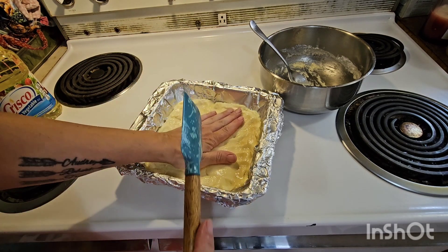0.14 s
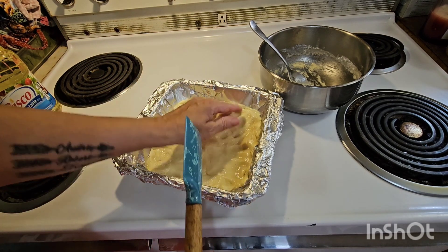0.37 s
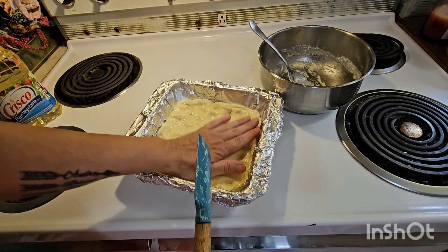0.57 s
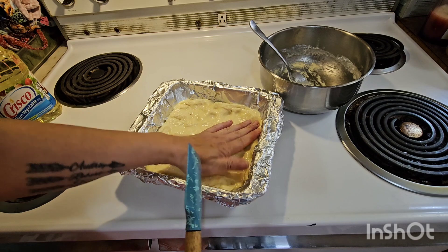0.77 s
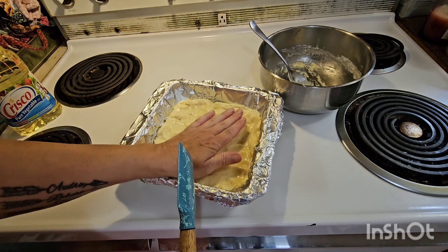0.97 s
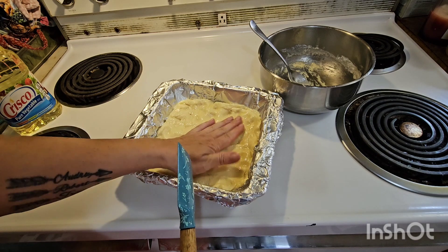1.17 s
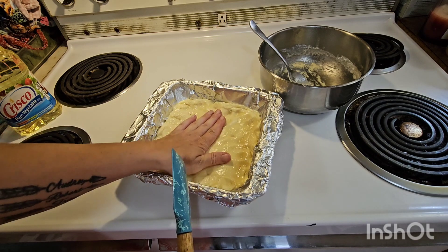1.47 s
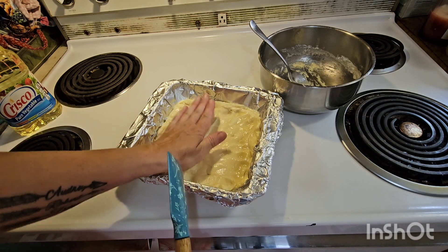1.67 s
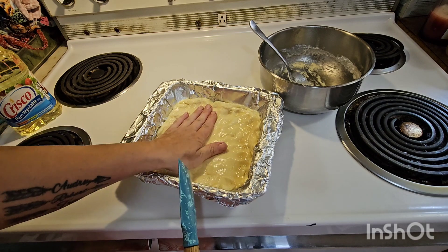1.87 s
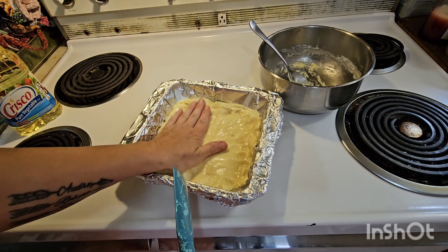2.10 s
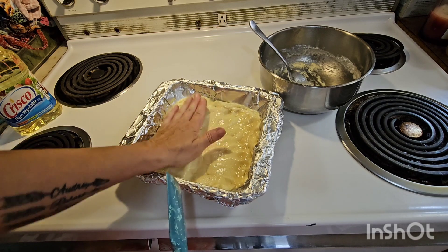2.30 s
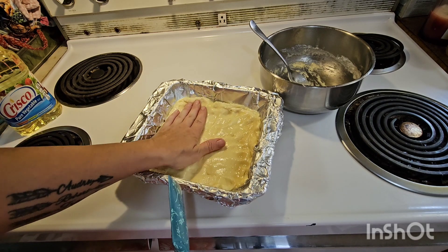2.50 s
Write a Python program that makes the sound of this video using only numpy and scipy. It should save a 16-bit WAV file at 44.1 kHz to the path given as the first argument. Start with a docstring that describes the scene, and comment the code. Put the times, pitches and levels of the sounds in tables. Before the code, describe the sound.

Foil crackling in a baking pan under a hand pressing dough, close up in a kitchen.

```python
"""A small hard kitchen, a stereo microphone close to the stove, an appliance humming low behind.
A hand presses sticky dough into a baking pan lined with aluminium foil. Each press makes the foil
crinkle, and its creases buckle in sharp snaps, often in pairs; the pan knocks dully under them.
The palm thuds softly through the dough, and the stove top and walls answer the foil and the pan."""
import sys
import numpy as np
from scipy import signal
from scipy.fft import rfft, irfft, next_fast_len
from scipy.io import wavfile

SR = 44100
rng = np.random.default_rng(int(sys.argv[2]) if len(sys.argv) > 2 else 0)


def persist_wave(psi):
    """Save psi, clipped to +-1, as 16-bit WAV."""
    counts = np.round(np.clip(psi, -1, 1) * 32767).astype(np.int16)
    wavfile.write(sys.argv[1], SR, np.atleast_2d(counts).T)


N = 116865
T = np.arange(N) / SR


def amp(db):
    """Decibels to gain."""
    return 10 ** (np.asarray(db) / 20)


def unit(x):
    """Scale to rms 1."""
    return x / np.sqrt(np.mean(x ** 2) + 1e-20)


def decay(t, t60):
    """An envelope that falls 60 dB in t60."""
    return np.exp(-np.log(1000) * t / t60)


def along(points, hz):
    """Read (freq_hz, value) points on a log frequency axis."""
    freqs, values = np.transpose(points)
    return np.interp(np.log(hz + 1), np.log(freqs + 1), values)


def filtered(x, response):
    """Filter x by a gain given as a function of frequency."""
    size = next_fast_len(N + SR // 2)
    return irfft(rfft(x, size) * response(np.fft.rfftfreq(size, 1 / SR)), size)[..., :N]


def ring(x, colour, size=2048):
    """Pass x through a minimum-phase body of the given colour and unit energy."""
    cepstrum = irfft(np.log(amp(along(colour, np.fft.rfftfreq(size, 1 / SR)))))
    cepstrum[1:size // 2] *= 2
    cepstrum[size // 2 + 1:] = 0
    impulse = irfft(np.exp(rfft(cepstrum)))
    return signal.fftconvolve(x, impulse[None] / np.linalg.norm(impulse), axes=1)[:, :N]


def mid_side(likeness):
    """Mid and side gains that give this correlation between left and right."""
    angle = np.arccos(likeness) / 2
    return np.array([np.cos(angle), np.sin(angle)])


def place(pair, likeness):
    """Spread two unrelated signals across the microphone's left and right."""
    mid, side = mid_side(likeness)[:, None] * pair
    return np.array([mid + side, mid - side])


# Colour of the background rush: freq_hz, relative_db
RUSH_COLOUR = [(25, -10), (45, -8), (117, -7), (180, -8), (270, -2), (450, -9), (695, -14.5), (1190, -24),
               (1890, -26), (2500, -36), (4250, -49), (7500, -30.5), (10100, -61), (12000, -42.5),
               (16000, -41)]
# Its left-right correlation, before the right side is inverted: freq_hz, likeness
RUSH_LIKENESS = [(60, 1), (150, 0.89), (300, 0.85), (700, 0.37), (3000, .1)]
# Hum lines of the appliance: pitch_hz, level_db, width_hz
HUM_LINES = [(75.5, -71.5, 30), (227.6, -63, 7.1), (260.2, -66.5, 32), (375, -69.5, 14)]

def appliance():
    """In the background, a steady low rush and wavering hum lines, in opposite polarity left and right."""
    noise = rng.standard_normal((2, N))
    mid, side = filtered(noise, lambda hz: amp(along(RUSH_COLOUR, hz)) * mid_side(along(RUSH_LIKENESS, hz)))
    rush = amp(-60) * unit(np.array([mid + side, mid - side]))
    hum = np.zeros(N)
    for pitch_hz, level_db, width_hz in HUM_LINES:
        line = filtered(rng.standard_normal(N), lambda hz: 1 / (1 + (2 * (hz - pitch_hz) / width_hz) ** 2))
        hum += amp(level_db) * unit(line)
    return (rush + hum) * amp([[1], [-1]])


# Reverberation time of the hard walls: freq_hz, t60_s
WALL_DECAY = [(200, 0.23), (1500, 0.2), (5000, 0.23), (9000, 0.26), (15000, 0.17)]
# Their answer against the direct sound: freq_hz, relative_db
WALL_LEVELS = [(200, 4), (1500, -10), (5000, -8.5), (9000, -12), (15000, -8)]

def kitchen(direct, positions=9, build_up_s=0.0028, stove_t60_s=0.051):
    """The stove top close by and the walls beyond answer, a little differently as the hand moves."""
    reflections = np.zeros((2, N))
    hand_position = np.linspace(0, positions - 1, N)
    for position in range(positions):
        hz, t, noise = signal.stft(rng.standard_normal((2, SR // 2)), SR, nperseg=256)
        wall_t60_s = along(WALL_DECAY, hz)[:, None]
        walls = amp(along(WALL_LEVELS, hz))[:, None] * decay(t, wall_t60_s) / np.sqrt(wall_t60_s)
        stove = amp(-5.5) * decay(t, stove_t60_s) / np.sqrt(stove_t60_s)
        tail = signal.istft(noise * np.hypot(walls, stove), SR, nperseg=256)[1]
        tail *= np.sqrt(2 * np.log(1000) / SR)  # normalises the energy of the decay
        tail *= np.minimum(T[:tail.shape[1]] / build_up_s, 1) ** 2
        crossfade = np.sqrt(np.maximum(1 - abs(hand_position - position), 0))
        reflections += signal.fftconvolve(direct * crossfade, tail, axes=1)[:, :N]
    return reflections


# The palm bearing down on the pan: peak_s, width_s, level_db
PALM_PUSHES = [(.66, 0.024, -71), (.82, 0.017, -59.5), (.92, 0.054, -64), (1.66, 0.049, -56.5),
               (2.43, 0.071, -59.5)]
# Colour of its thud: freq_hz, relative_db
PALM_COLOUR = [(25, -20), (45, -7), (76, 5.5), (105, -11), (170, -2), (300, -3), (600, -39.5)]

def palm():
    """Dead centre, soft low thuds as the weight of the hand goes through the dough."""
    weight = sum(amp(level_db) * np.exp(-0.5 * ((T - peak_s) / width_s) ** 2)
                 for peak_s, width_s, level_db in PALM_PUSHES)
    return weight * unit(filtered(rng.standard_normal(N), lambda hz: amp(along(PALM_COLOUR, hz))))


# Spells of fine crinkling under the hand: peak_s, swell_s, release_s, treble_db, mid_db
CRINKLE_SPELLS = [ (.12, 0.17, 0.027, -69, -65.5), (0.238, 0.048, 0.16, -47, -48),
                  (0.41, 0.026, 0.012, -39, -46), (0.621, .015, 0.019, -51.5, -59.5),
                  (0.693, 0.0084, 0.087, -51.5, -62), (.855, .16, 0.066, -45, -52.5),
                  (.97, 0.1, 0.1, -52, -62.5), (1.232, 0.044, 0.087, -37.5, -47.5),
                  (1.455, 0.12, 0.024, -53, -64.5), (1.6, 0.062, .03, -48, -70),
                  (1.654, 0.072, 0.065, -42, -47), (1.785, 0.092, 0.3, -63, -72.5),
                  (1.943, 0.024, 0.074, -43.5, -48), (2.16, 0.12, 0.066, -52.5, -63.5),
                  (2.278, 0.11, .02, -46, -60.5), (2.334, 0.044, 0.11, -45, -50.5),
                  (2.47, 0.094, 0.057, -55, -78), (2.642, 0.058, .06, -44.5, -51.5)]

def crinkle(ticks_per_s=1500, spread_db=3.5, tick_t60_s=0.0078):
    """Small wrinkles tick at random under each press: envelopes for the treble and midrange."""
    power = np.zeros((2, N))
    for peak_s, swell_s, release_s, treble_db, mid_db in CRINKLE_SPELLS:
        shape_db = -18.5 * np.maximum((peak_s - T) / swell_s, (T - peak_s) / release_s)
        power += amp(np.array([[treble_db], [mid_db]]) + shape_db) ** 2
    sizes = amp(spread_db * np.clip(rng.standard_normal((2, N)), -2, 2.5))
    ticks = sizes * (rng.random((2, N)) < ticks_per_s / SR)
    tick_power = signal.lfilter([1], [1, -10 ** (-6 / (tick_t60_s * SR))], ticks ** 2)
    return np.sqrt(power * tick_power / tick_power.mean())


# Low modes of the dough-damped pan: pitch_hz, relative_db, t60_s
PAN_RESONANCES = [(397, -3.5, 0.049), (461, 1, 0.033), (561, 1.5, 0.031)]
# Creases buckling, each heard as a knock, a facet's ring and a snap (levels before the mix):
# start_s, treble_db, mid_db, knock_db, top_lift_db, rise_ms, t60_ms, ring_hz, ring_db
CREASES = [ (0.1421, -45, -47.5, -67, -15, .4, 19, 2850, -44),
           (0.2086, -48.5, -40.5, -84, -14, 0.5, 19, 1627, -36),
           (0.2375, -16, -28, -67, 4, 0.72, 14, 1675, -26.5),
           (.2652, -24, -46, -68, 1, 1.2, 17, 2510, -32.5),
           (0.2918, -20.5, -36, -75, 4.5, 0.22, 10, 2847, -36),
           (.336, -31, -47.5, -66, 2, 4.1, 50, 1590, -43.5), (0.3972, -41, -49, -68, -4, 1, 18, 1920, -64),
           (.409, -45, -44.5, -68, -18, 1.7, 20, 1050, -44),
           (0.4255, -45.5, -57, -66, 3, 0.35, 6.5, 4170, -41),
           (0.4396, -51, -62, -76, 3, .3, 10, 2550, -51),
           (0.5463, -43.5, -52.5, -81, -17, 2.4, 5.5, 2100, -70.5),
           (.69, -46, -71, -63, -4, 1, 29, 4640, -50), (0.7082, -32, -59, -74, -4, 0.32, 18, 5950, -44),
           (0.807, -42, -64, -48.5, -2, 2.8, 26, 1300, -61),
           (0.8114, -36.5, -64, -56, 6.5, .8, 11, 5990, -38.5),
           (.841, -35, -37.5, -60, -21, 3.3, 15, 3070, -32.5),
           (0.8639, -39.5, -49, -48.5, -18, 1, 21, 3680, -43),
           (0.9154, -38.5, -50, -78, 0, 0.53, 13, 3130, -53),
           (.926, -23.5, -40, -45, 0.5, 0.8, 36, 4300, -54), (0.9397, -34, -41.5, -64, 1, 2, 32, 1480, -43),
           (.955, -45, -50, -71, 0, .4, 14, 3880, -48), (0.979, -41.5, -45, -74, -19, 1.5, 29, 1350, -44.5),
           (1.0846, -29, -34, -56, -1.5, 0.72, 17.6, 1745, -34.5),
           (1.1688, -46.5, -74, -72, 9.5, 0.14, 4.6, 8000, -58),
           (1.2074, -26.5, -36.5, -57, 4.5, .6, 14, 1750, -33),
           (1.2184, -33, -33.5, -55, -12, 1.3, 12, 1640, -50),
           (1.228, -26.5, -43, -67, 6, .6, 12, 8300, -43),
           (1.233, -17, -32, -39, 1.5, 1.3, 24, 8420, -21.5),
           (1.2643, -21, -33, -57, 2.5, 4.3, 32, 1570, -43.5),
           (1.301, -40, -44, -68, 4, .4, 8.6, 1940, -68),
           (1.4243, -40, -43.5, -58.5, -2, 0.47, 24.4, 2446, -48),
           (1.6026, -18.5, -35, -48, 0.5, 1.5, 24.4, 2910, -30),
           (1.666, -19, -39.5, -61, 0, 0.5, 28, 1530, -37),
           (1.6873, -31, -43, -70, -2, 0.35, 10, 1500, -41), (1.928, -64, -44, -69, 6, 0.71, 20, 2370, -35),
           (1.9475, -19.5, -32.5, -55, 4.5, 1.4, 13.3, 2346, -28),
           (2, -40.5, -41.5, -56, 6, 1.2, 25, 1820, -65),
           (2.0204, -19.5, -33.5, -46, 1, 1.2, 25.3, 5800, -47),
           (2.127, -40, -48, -74, -1, 0.47, 6.2, 1740, -52), (2.1422, -49, -60, -77, -8, .6, 50, 2206, -44),
           (2.2808, -14, -31, -47.5, 0.5, 0.57, 18, 4430, -30),
           (2.335, -36.5, -56, -64, 2, 0.63, 9.5, 1440, -45),
           (2.352, -19.5, -37, -45.5, 1.5, 0.98, 27.6, 3146, -30),
           (2.422, -43, -50.5, -61, -13, .6, 25, 2160, -46),
           (2.5955, -39.5, -71, -75, -4, 0.18, 5.5, 7900, -58),
           (2.636, -41, -47.5, -79, -18, 0.76, 14, 1500, -61)]

def pan_knocks():
    """The jolt of each snap rings the low modes of the pan, which the dough soon damps."""
    knocks, t = np.zeros(N + SR), T[:SR // 10]
    for start_s, _, _, knock_db, *_ in CREASES:
        for pitch_hz, mode_db, t60_s in PAN_RESONANCES:
            envelope = amp(knock_db + mode_db) * decay(t, t60_s) * (1 - np.exp(-pitch_hz * t))
            phase = 2 * np.pi * pitch_hz * t + rng.uniform(0, 2 * np.pi)
            knocks[round(start_s * SR):][:len(t)] += envelope * np.sin(phase)
    return knocks[:N]


def facets(t60_s=0.017, wander_hz=119, gain_db=-1.5, right_lead_s=0.00004):
    """Each snap flips a flat facet of foil, which gives a brief, unsteady, tinny ring."""
    rings, t = np.zeros((2, N + SR)), T[:SR // 10]
    for start_s, *_, ring_hz, ring_db in CREASES:
        wander = np.cumsum(rng.standard_normal(len(t))) * np.sqrt(2 * np.pi * wander_hz / SR)
        envelope = amp(ring_db + gain_db) * decay(t, t60_s) * (1 - np.exp(-ring_hz * t))
        phase = 2 * np.pi * ring_hz * np.array([t, t + right_lead_s]) + wander
        onset = round((start_s - 1 / ring_hz) * SR)  # one cycle ahead of the snap
        rings[:, onset:][:, :len(t)] += np.sqrt(2) * envelope * np.sin(phase)
    return rings[:, :N]


def snaps():
    """Each crease gives way in an avalanche of slips: envelopes for treble, top octave, midrange and pan."""
    power = np.zeros((4, N))
    for start_s, treble_db, mid_db, knock_db, top_lift_db, rise_ms, t60_ms, *_ in CREASES:
        age_ms = (T - start_s) * 1000
        rise = np.exp(np.minimum(age_ms, 0) / rise_ms)
        fall = decay(np.maximum(age_ms - 1, 0), t60_ms)  # after a 1 ms hold
        gains = amp([treble_db, treble_db + top_lift_db, mid_db, knock_db])
        power += (gains[:, None] * rise * fall) ** 2
    return np.sqrt(power)


def slips(per_s=18000):
    """Two dense random trains of tiny buckles, rms 1."""
    sizes = rng.choice([-1, 1], (2, N)) * rng.uniform(0.36, 1, (2, N))
    return unit(sizes * (rng.random((2, N)) < per_s / SR))


# Colours of the foil's treble, its midrange and the pan beneath: freq_hz, relative_db
TREBLE_COLOUR = [(1500, -44), (2800, -21), (4200, -2), (5500, -4.5), (6800, -1), (8400, 3.5), (9050, 0),
                 (9400, -9), (10600, -6.5), (11800, 2), (12800, 4), (13600, -1), (15300, 3.5),
                 (16000, -72.5), (17000, -15)]
MID_COLOUR = [(400, -20.5), (750, -19), (1000, -9), (1250, 1), (1600, 2), (2200, 0), (3000, -1.5),
              (4200, -7), (7000, -21.5)]
PAN_COLOUR = [(60, -23.5), (200, -29.5), (330, -3), (480, 1), (600, 0), (800, -6), (1000, -5.5),
              (1500, -27), (3000, -61)]

def foil(top_octave_hz=10100):
    """Close up, snaps and crinkling sound through the bright foil, wide, and the dull pan, near centre."""
    snap_treble, snap_top, snap_mid, snap_pan = snaps()
    fine_treble, fine_mid = crinkle()
    snap_slips = slips()
    top_lift = filtered((snap_top - snap_treble) * snap_slips,
                        lambda hz: 1 / (1 + (top_octave_hz / (hz + 1)) ** 12))
    treble = ring(snap_treble * snap_slips + top_lift + fine_treble * slips(), TREBLE_COLOUR)
    midrange = ring(np.hypot(snap_mid, fine_mid) * slips(), MID_COLOUR)
    pan = ring(np.hypot(snap_pan, amp(-8) * fine_mid) * slips(), PAN_COLOUR)
    return (amp(-4.5) * place(treble, likeness=0.033)
            + amp(-2) * place(midrange, likeness=0.18)
            + amp(-3) * place(pan, likeness=0.95))


# Lean of the foil, pan and reflections at the microphone: freq_hz, left_minus_right_db
MIC_BALANCE = [(300, 0), (500, 5.5), (850, -3), (1500, 5.5), (2200, 0), (3000, 2.5), (4200, 0.5), (6000, 3),
               (8300, -1.5), (10500, 0), (12000, -5), (13500, -6.5), (15500, 0.5)]

def scene():
    """From beside the stove, the foil's midrange leans mostly left and its top octave right."""
    direct = foil() + facets() + pan_knocks()
    in_room = direct + kitchen(direct)
    at_mic = filtered(in_room, lambda hz: amp(along(MIC_BALANCE, hz) * np.array([[0.5], [-0.5]])))
    return at_mic + palm() + appliance()


def record(dry):
    """The microphone passes nothing above its band limit."""
    limit_hz = 16979
    return filtered(dry, lambda hz: hz < limit_hz)


dry = scene()
out = record(dry)
persist_wave(out)
```